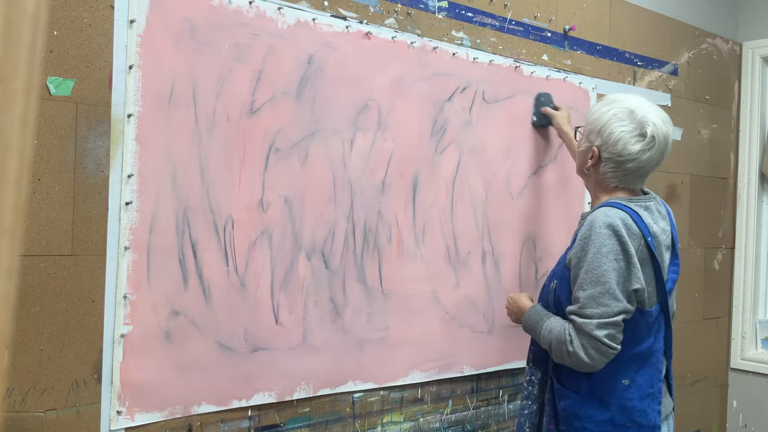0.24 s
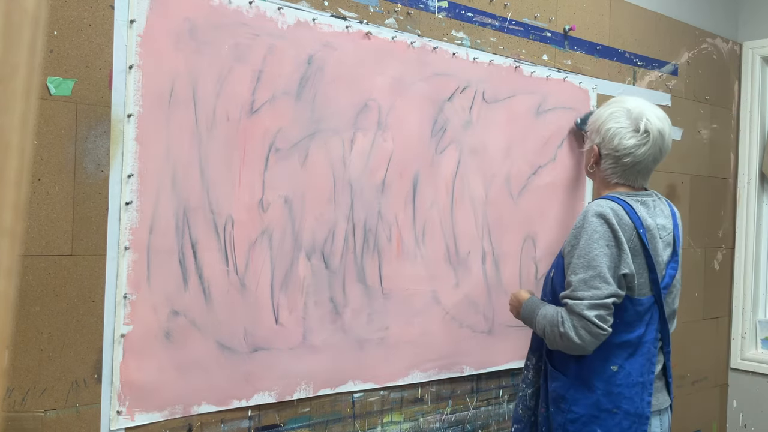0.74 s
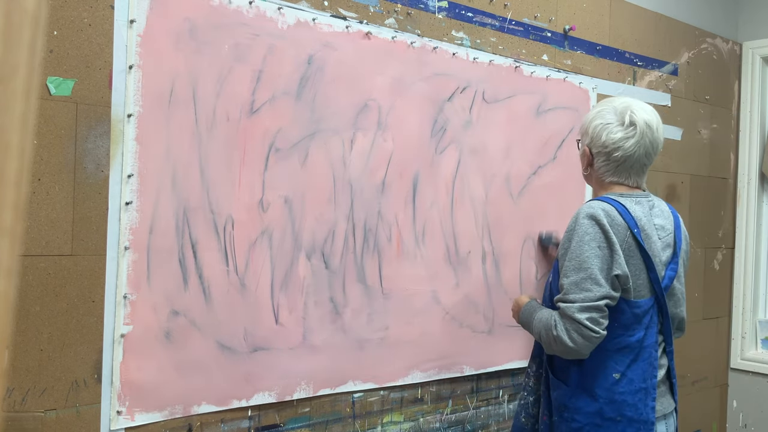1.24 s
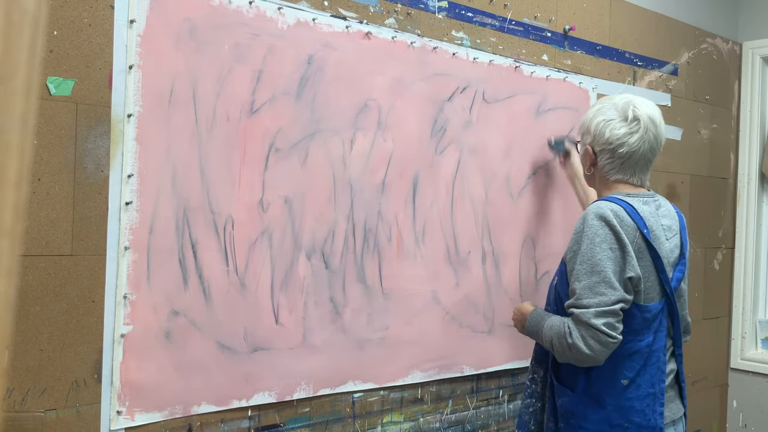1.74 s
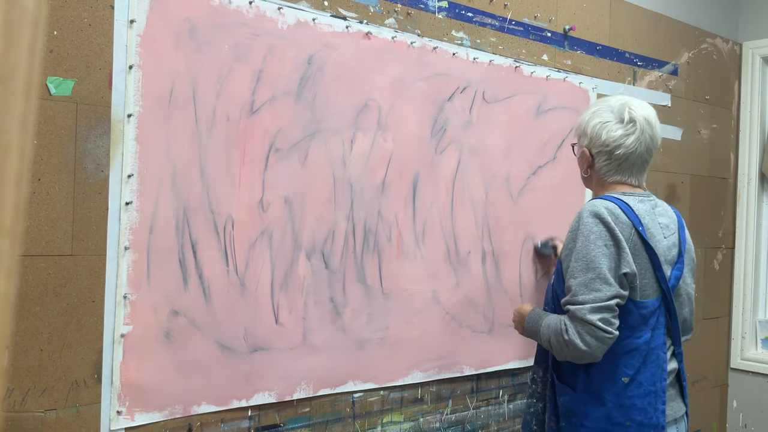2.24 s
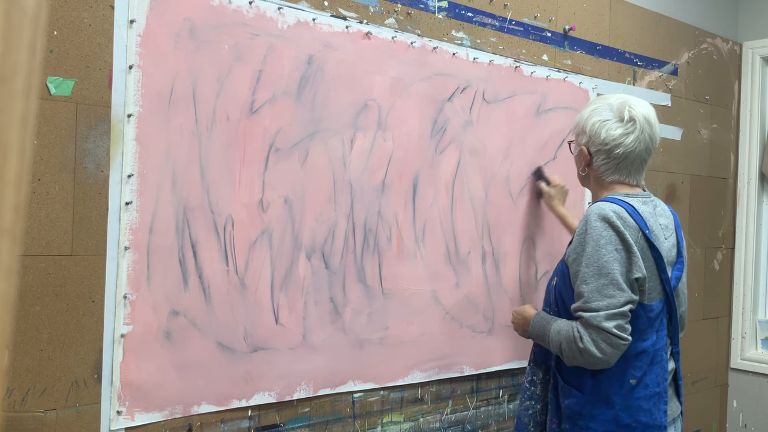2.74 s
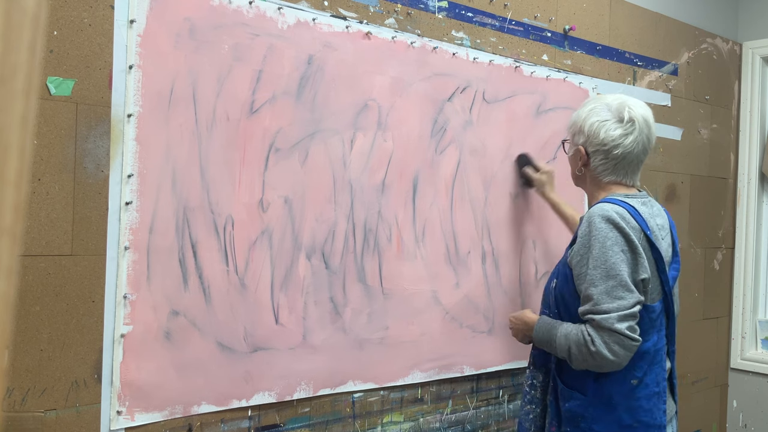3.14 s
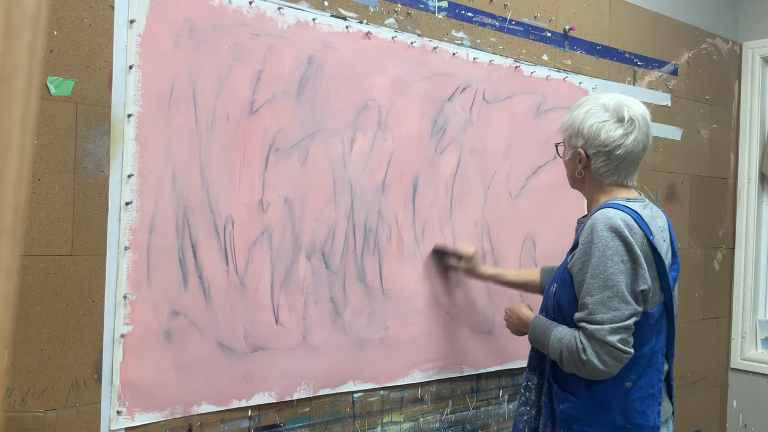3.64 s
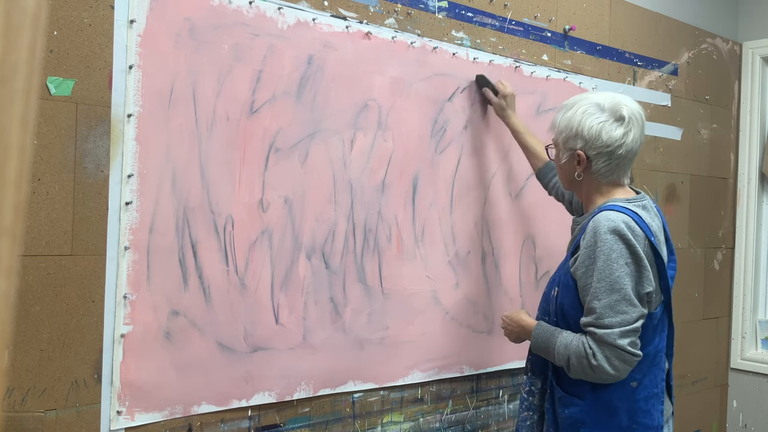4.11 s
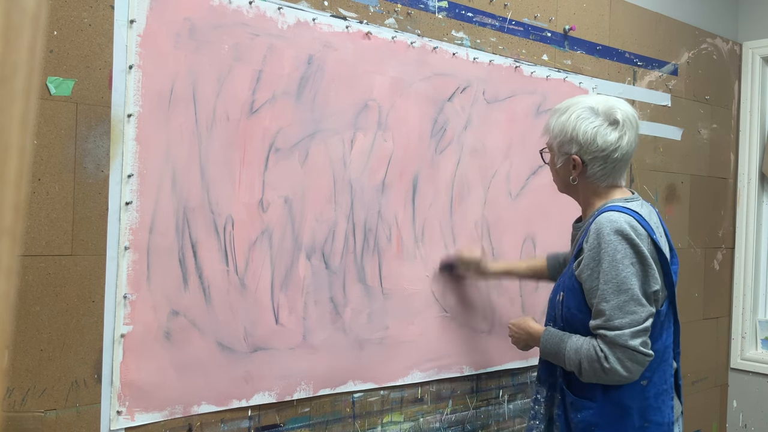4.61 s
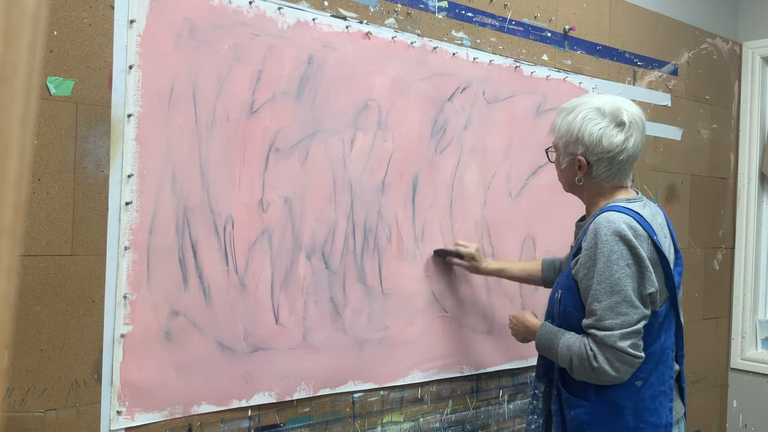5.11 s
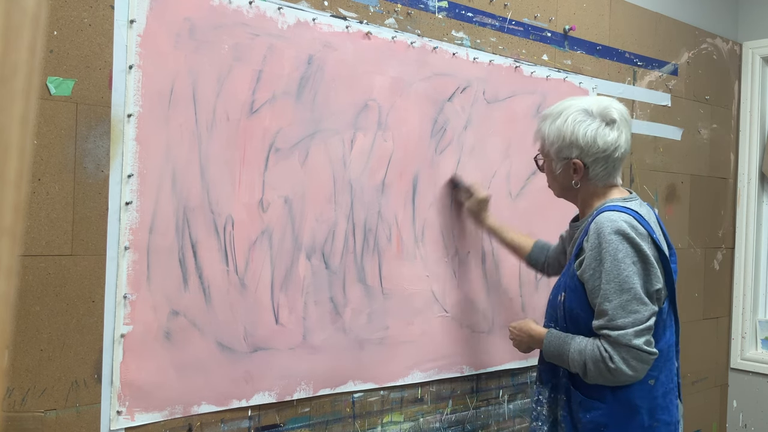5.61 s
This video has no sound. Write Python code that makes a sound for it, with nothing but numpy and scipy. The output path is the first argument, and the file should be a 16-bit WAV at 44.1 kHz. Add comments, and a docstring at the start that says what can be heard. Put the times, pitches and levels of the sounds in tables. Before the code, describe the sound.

In a small hard studio with very faint, steady air noise, a wide, nearly dry brush rubs a large stretched canvas. A soft, low rubbing stroke fades by 0.4 s, and a slightly brighter one ends near 0.7 s. After a pause the brush lands at 0.9 s with a small slap and dull thump, then scrapes around 1.2 and 1.4 s with brief squeaks, trailing off by 1.7 s. It lands more firmly at 2.0 s for a softer, hollow rub until 2.4 s. A light touch at 2.6 s starts continuous scrubbing, sharply scratchy at 2.9 s and around 3.2 to 3.6 s, then longer, steadier strokes swinging in tone between hollow and bright. Short gliding squeaks appear near 3.6, 4.5, 5.3 and 5.6 s, a wide hiss at 4.4 s, and a low canvas groan with a boom near 4.5 s. Other soft booms underlie the rubbing, which stops near 5.9 s.

```python
"""A wide, nearly dry brush scrubs paint over a large canvas: bristle clicks from the weave, split into
scratch, fizz and a rub through a gliding resonance, follow the speed of each stroke. Noise through drum
modes is the canvas under the hand, and as the brush lands; unsteady gliding tones are stick-slip squeaks,
one wide hiss and a low groan of the canvas. A small hard studio answers with sparse decaying reflections
over faint, steady coloured noise, its air."""
import sys
import numpy as np
from scipy import signal
from scipy.fft import rfft, irfft
from scipy.io import wavfile
from scipy.ndimage import uniform_filter1d

SR = 44100
rng = np.random.default_rng(int(sys.argv[2]) if len(sys.argv) > 2 else 0)


def transcribe(u):
    """Save the signal u as a 16-bit wav file named by the first command-line argument.

    u: samples, shape (n,) or (channels, n), limited to [-1, 1]; the rate is SR.
    q: integer samples, one column per channel.
    """
    v = np.clip(np.atleast_2d(u).T, -1, 1)
    q = np.round(v * 32767).astype(np.int16)
    wavfile.write(sys.argv[1], SR, q)


N = 258415


def gain_of(db):
    """Level law: decibels to an amplitude factor."""
    return 10 ** (np.asarray(db) / 20)


def evened(x):
    """Normalisation: scales a signal to an rms of 1."""
    return x / np.sqrt(np.mean(x ** 2) + 1e-20)


def read(points, hz):
    """Logarithmic frequency scale: interpolates a table of (f/Hz, value) along it."""
    f, value = np.transpose(points)
    return np.interp(np.log(hz + 1), np.log(f + 1), value)


def add(mix, s, sound):
    """Superposition: adds a sound to the mix from time s."""
    part = mix[max(round(s * SR), 0):][:len(sound)]
    part += sound[:len(part)]


def coloured(x, spectrum):
    """Linear filtering: weights the spectrum of x by a table, then sets an rms of 1."""
    hz = np.fft.rfftfreq(len(x), 1 / SR)
    weighted = rfft(x) * gain_of(read(spectrum, hz))
    return evened(irfft(weighted, len(x)))


def wander(rate_hz):
    """Low-pass random process: Gaussian-filtered noise of rms 1, moving up to about the given rate."""
    count = 2 ** 18
    hz = np.fft.rfftfreq(count, 1 / SR)
    slow = rfft(rng.standard_normal(count)) * np.exp(-(hz / rate_hz) ** 2)
    return evened(irfft(slow)[:N])


def still_air(level_db=-76.5):
    """Stationary background noise: the air of the studio as white noise with a fixed spectrum."""
    # spectrum of the still air: f/Hz, relative level/dB
    air_spectrum = [(25, -29), (55, -9), (80, -3.5), (118, 0.5), (170, -6), (260, -3.5), (400, -7.5),
                    (750, -15), (2000, -19.5), (5500, -16.5), (9000, -21.5), (15500, -24.5)]
    return gain_of(level_db) * coloured(rng.standard_normal(N), air_spectrum)


def reflections():
    """Exponential decay: sparse wall reflections of random sign, each band dying at its own rate."""
    # reverberation of the studio: f/Hz, decay time by 60 dB/s
    decay_times = [(120, 0.37), (660, 0.34), (1500, 0.44), (2700, 0.32), (4600, 0.13), (8000, 0.26),
                   (13000, 0.33)]
    spacing = 16  # samples, with one tap at random in each
    taps, at = np.zeros(SR), np.arange(SR // 250, SR - spacing, spacing)
    taps[at + rng.integers(0, spacing, len(at))] = rng.choice([-1., 1.], len(at))
    hz, t, z = signal.stft(taps, SR, nperseg=256)
    decay = np.exp(-np.log(1000) * t / read(decay_times, hz)[:, None])
    tail = signal.istft(z * decay, SR, nperseg=256)[1]
    return evened(tail) / np.sqrt(len(tail))  # unit energy


def studio(x, count=5, sweeps_per_s=1.7):
    """Room response by convolution: the travelling brush crossfades between sets of reflections."""
    place = np.arange(N) / SR * sweeps_per_s * count
    out = np.zeros(N)
    for k in range(count):
        distance = abs((place - k) % count - count / 2)
        share = np.cos(np.pi / 2 * np.minimum(distance, 1))  # equal-power crossfade
        out += signal.fftconvolve(x * share, reflections())[:N]
    return out


def canvas(push):
    """Membrane resonance: the cloth answers a push with a broad boom and a few drum modes."""
    # modes of the canvas: f/Hz, width/Hz, level over the broad boom/dB
    drum_modes = [(102, 10, -1.5), (117, 11, -5), (142.4, 8.3, 5), (168.3, 14, 1), (280, 22, -0.5)]
    # spectrum of the broad boom: f/Hz, relative level/dB
    boom_spectrum = [(25, -35), (42, -26.5), (55, -10), (72, -17.5), (100, -3), (160, -0.5), (215, 0),
                     (275, -4.5), (370, -5.5), (600, -12), (2000, -56.5)]
    hz = np.fft.rfftfreq(len(push), 1 / SR)
    modes = sum(gain_of(db) / (1 + (2 * (hz - f) / width) ** 2) for f, width, db in drum_modes)
    return coloured(irfft(rfft(push) * (1 + modes), len(push)), boom_spectrum)


def landings(slap_s=0.032, thump_s=0.018):
    """Impact excitation: the bristle tips slap first, then the weight of the hand thumps the cloth."""
    # the brush lands: t/s, slap level/dB, thump level/dB, delay until the thump sets in/s
    touchdowns = [(0.91, -54.5, -51.5, 0.023), (1.98, -50, -49, 0.0076), (2.624, -59, -54, .022)]
    # spectrum of the slap: f/Hz, relative level/dB
    slap_spectrum = [(150, -14.5), (500, 2.0), (1200, -3.5), (2600, -2.5),
                     (5500, -12.5), (7000, -44), (15000, -33)]
    t, out = np.arange(8192) / SR, np.zeros(N)
    slap_decay = np.exp(-t / slap_s)
    thump_swell = t / thump_s * np.exp(1 - t / thump_s)  # peaks at 1 after thump_s
    for s, slap_db, thump_db, delay in touchdowns:
        tips, push = rng.standard_normal((2, len(t)))
        add(out, s, gain_of(slap_db) * coloured(tips, slap_spectrum) * slap_decay)
        add(out, s + delay, gain_of(thump_db) * canvas(push) * thump_swell)
    return out


def squeaks(overtone_db=-22, flutter_db=2.5, grab_s=0.0016, grip_s=0.0085):
    """Stick-slip: unsteady gliding tones; most surge louder and purer at the grip, a few stay even or dip."""
    # squeaks; the row near 4860 Hz is a wide hiss, the one very low row the canvas groaning under a
    # hard push: grip t/s, lead-in/s, tail/s, f at the grip/Hz, glide/(Hz/s), scatter before the
    # change at the grip/Hz, level before that change/dB, change of level at the grip/dB
    slips = [ (1.338, .075, .05, 2530, 199, 162, -51, 18), (1.4, .035, .055, 2224, -1000, 123, -49, 3),
             (1.409, .05, 0.036, 1430, 1700, 200, -50.5, 2.5),
             (2.22, .055, 0.039, 1945, -300, 190, -56.5, -2.5),
             (2.922, .05, 0.046, 1532, -5500, 177, -51.5, 6),
             (3.235, .035, 0.035, 1240, -5000, 210, -57, 4), (3.558, .02, .09, 2390, -700, 110, -45.5, 7),
             (3.76, .04, .06, 519.6, 0, 34, -62.5, 0), (4.369, .05, 0.097, 4860, 1600, 830, -49.5, -3),
             (4.463, .015, 0.051, 2807, -2500, 370, -47, 6.5), (4.479, .04, .08, 138.3, -25, 14.5, -48, 4),
             (4.765, .011, 0.0099, 1855, -5000, 136, -48, 1.5),
             (4.937, .009, .014, 1254, -800, 40, -47, 1.5), (5.343, .034, 0.049, 2107, -2700, 125, -45, 8),
             (5.54, .04, .045, 770, -300, 67, -62.5, 0), (5.61, .014, .014, 2157, 3000, 65, -46.5, 3)]
    scatter, flutter, out = wander(rate_hz=573), wander(rate_hz=230), np.zeros(N)
    for s, lead, tail, hz, glide, scatter_hz, db, surge_db in slips:
        t = np.arange(-lead, tail, 1 / SR)
        at = np.clip(round((s - lead) * SR) + np.arange(len(t)), 0, N - 1)
        grip = 1 + (gain_of(surge_db) - 1) * np.exp(-abs(t / grip_s) ** 8)
        pitch_hz = hz + glide * t + scatter_hz * scatter[at] / np.sqrt(grip)
        phase = 2 * np.pi * np.cumsum(pitch_hz) / SR
        tone = np.sin(phase) + gain_of(overtone_db) * np.sin(2 * phase)  # with a weak octave
        tone = evened(tone * gain_of(flutter_db * flutter[at]))
        fades = signal.windows.tukey(len(t), 2 * grab_s / (lead + tail))
        add(out, s - lead, gain_of(db) * grip * tone * fades)
    return out


def speed(t, s, attack, hold, release):
    """Stroke kinematics: share of full speed, a tenth at the ends of attack and release."""
    # the brush is on the canvas: from t/s, until t/s
    contact_spans = [(0, 0.72), (.915, 1.75), (1.984, 2.58), (2.621, 5.87)]
    ease = 1.41  # the arm leaves full speed gently, then slows ever faster
    away = np.maximum((s - t) / attack, 0) + np.maximum((t - s - hold) / release, 0)
    down, up = min(contact_spans, key=lambda span: abs(np.clip(s, *span) - s))
    return (t >= down) * (t <= up) * .1 ** (away ** ease)


def arm():
    """Power laws of speed: levels of scratch, fizz, rub and drumming, and the centre of the rub."""
    # strokes of the arm and surges within them; the faintest are bristle tips trailing as the brush
    # lifts. Full speed from t/s, attack/s, hold/s, release/s, then levels before the trims of the
    # layers: scratch/dB, fizz relative to scratch/dB, rub/dB, drumming/dB; rub centre f at full speed/Hz
    strokes = [ (0.0, .1, .21, .27, -62, -3.5, -59, -69, 350),
               (0.556, 0.4, .026, 0.11, -58, -1, -59.5, -75, 1120),
               (0.688, .05, .01, .08, -72.5, -18, -88, -92, 1100),
               (1.185, 0.18, 0.039, 0.15, -50, -8, -55, -69.5, 1250),
               (1.374, .14, .041, 0.097, -45.3, -10.5, -56, -68, 1350),
               (1.558, 0.17, 0.022, 0.063, -69, -24, -90, -94, 1400),
               (2, 0.078, 0.093, 0.087, -58.5, -3, -59.5, -64, 620),
               (2.146, 0.24, 0.13, .1, -56.5, -5.5, -57.2, -63, 1020),
               (2.45, 0.15, 0.023, 0.088, -79.5, -6.6, -101, -93, 990),
               (2.718, 0.14, 0.079, 0.12, -49, -3, -56.8, -64, 774),
               (2.886, 0.07, 0.011, 0.11, -41, -7, -54.5, -61, 1080),
               (3.215, .3, 0.024, 0.11, -45.5, -7, -54.5, -62, 1000),
               (3.417, .118, 0.054, 0.14, -45, -6, -56, -65, 790),
               (3.551, 0.064, .015, 0.11, -42, -7, -56, -58, 895),
               (3.651, 0.095, 0.026, 0.15, -49.5, -4.5, -56.5, -63, 650),
               (3.872, .066, 0.19, 0.12, -48.5, -11, -57.5, -58.5, 1520),
               (4.323, 0.17, 0.16, 0.096, -48.5, -6, -56, -59.5, 610),
               (4.631, .121, 0.15, 0.11, -53.5, -7.5, -57.5, -61, 1430),
               (4.95, 0.055, 0.073, 0.19, -51, -4.5, -56, -61.5, 1150),
               (5.336, .22, 0.015, 0.14, -50, -8, -56.5, -57, 1060),
               (5.627, 0.15, 0.17, .236, -51, -6.5, -56.3, -62, 875)]
    # the hand leans in and the canvas booms: t/s, half length/s, level before the drumming trim/dB
    leans = [(3.7, 0.055, -52), (4.065, 0.027, -55.5), (4.477, .048, -49), (5.123, 0.049, -54),
             (5.762, 0.068, -51.5)]
    fizz_law, rub_law, drum_law = 1.01, 0.59, .58  # powers of the speed; the scratch follows it directly
    rest_hz = 648  # centre of the rub when the brush is barely moving
    t = np.arange(0, N, 64) / SR
    v = np.array([speed(t, *row[:4]) for row in strokes])
    v = uniform_filter1d(v, size=8).clip(0)
    scratch_db, fizz_db, rub_db, drum_db, top_hz = np.transpose(strokes)[4:, :, None]

    at, half, push_db = np.transpose(leans)[:, :, None]
    pushes = gain_of(push_db) * np.exp(-.5 * ((t - at) / half) ** 2)
    layers = (gain_of(scratch_db) * v,
              gain_of(scratch_db + fizz_db) * v ** fizz_law,
              gain_of(rub_db) * v ** rub_law,
              np.vstack([gain_of(drum_db) * v ** drum_law, pushes]))
    centres = rest_hz + (top_hz - rest_hz) * np.sqrt(v)
    centre_hz = np.average(centres, axis=0, weights=v + 1e-12)
    # overlapping strokes add in power
    controls = [np.linalg.norm(layer, axis=0) for layer in layers] + [centre_hz]
    return [np.interp(np.arange(N) / SR, t, c) for c in controls]


def bristles(per_s, spread_db, patchy_db):
    """Random impulse train: tips flick off the weave as clicks; passing tufts favour shifting bands."""
    size = gain_of(spread_db * np.minimum(rng.exponential(1, N), 4))
    clicks = size * rng.choice([-1., 1.], N) * (rng.random(N) < per_s / SR)
    z = signal.stft(clicks, nperseg=512)[2]
    tufts = uniform_filter1d(rng.standard_normal(z.shape), size=4, axis=0)  # over frequency
    tufts = evened(uniform_filter1d(tufts, size=5, axis=1))  # over time
    return signal.istft(z * gain_of(patchy_db * tufts), nperseg=512)[1][:N]


def hollow(x, centre_hz, rise_db=8, width_octaves=0.96):
    """Gliding resonance: a broad peak follows the speed of the brush, at constant power."""
    hz, t, z = signal.stft(x, SR, nperseg=1024)
    octaves = np.log2((hz[:, None] + 1) / np.interp(t, np.arange(N) / SR, centre_hz))
    gain = gain_of(rise_db * np.exp(-(octaves / width_octaves) ** 2))
    power = np.average(gain ** 2, axis=0, weights=np.mean(abs(z) ** 2, axis=1))
    return signal.istft(z * gain / np.sqrt(power), nperseg=1024)[1][:N]


def scrubbing(scratch_db=2.0, fizz_db=0.53, rub_db=1.1, drum_db=-0.35):
    """Friction noise: strokes scratch, fizz, rub and drum; the drag judders slightly in all at once."""
    # spectra of the three friction layers: f/Hz, relative level/dB
    scratch_spectrum = [(500, -39), (950, -21.5), (1280, -4), (1650, -3.5), (2300, -0.5), (2950, 0.5),
                        (3700, -3), (4950, -2), (5700, -6.5), (6600, -13), (8500, -16), (14000, -46.5)]
    fizz_spectrum = [(3500, -18.5), (5800, -1.5), (7500, -3), (9000, -4), (10500, -6), (12200, -6.5),
                     (14000, -10), (15700, -14)]
    rub_spectrum = [(150, -16), (270, -1.5), (400, -2), (540, -0.5), (720, -2), (950, -2.5), (1250, 0),
                    (1550, -1.5), (2000, -4.5), (4000, -44.5)]
    coarse, fine, drag, weight, centre_hz = arm()
    scratch = coloured(bristles(per_s=18000, spread_db=1.0, patchy_db=2.0), scratch_spectrum)
    fizz = coloured(bristles(per_s=25000, spread_db=4.0, patchy_db=2.5), fizz_spectrum)
    rub = coloured(bristles(per_s=6000, spread_db=2.5, patchy_db=1.2), rub_spectrum)
    rub = hollow(rub, centre_hz)
    drum = canvas(rng.standard_normal(N))
    out = coarse * gain_of(scratch_db) * scratch + fine * gain_of(fizz_db) * fizz
    out += drag * gain_of(rub_db) * rub + weight * gain_of(drum_db) * drum
    judder_db = .5 * wander(rate_hz=55)
    return out * gain_of(judder_db)


def scene(scrub_room_db=-10, ring_room_db=-4):
    """Superposition of direct sound, reflections and still air, the same in both ears."""
    scrub = scrubbing()
    ring = squeaks() + landings()
    room = studio(gain_of(scrub_room_db) * scrub + gain_of(ring_room_db) * ring)
    return np.tile(scrub + ring + room + still_air(), (2, 1))


def record(dry):
    """Band limiting: the microphone's bass roll-off, then a linear-phase low-pass."""
    bass_cut = signal.butter(4, 45, "highpass", fs=SR, output="sos")
    thin = signal.sosfilt(bass_cut, dry)
    treble_cut = signal.firwin(511, 15700, window=("kaiser", 9), fs=SR)
    return signal.oaconvolve(thin, treble_cut[None], "same")


dry = scene()
out = record(dry)
transcribe(out)
```